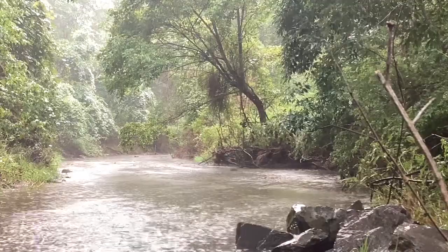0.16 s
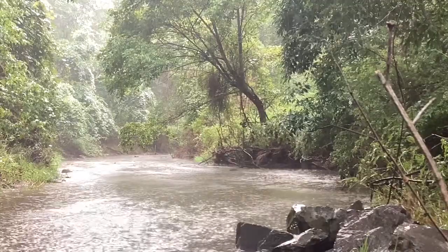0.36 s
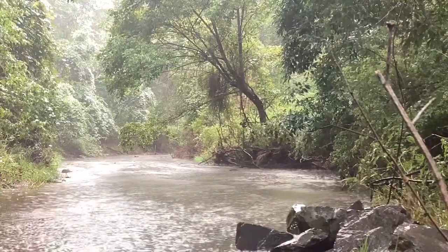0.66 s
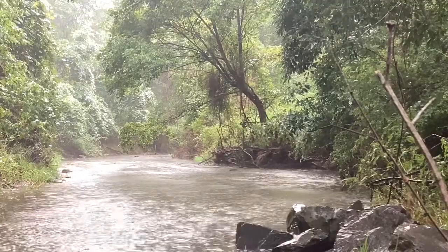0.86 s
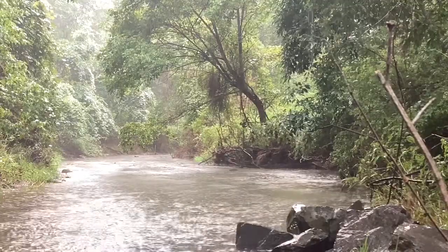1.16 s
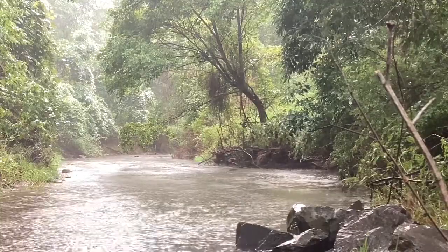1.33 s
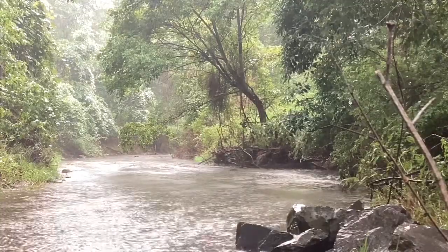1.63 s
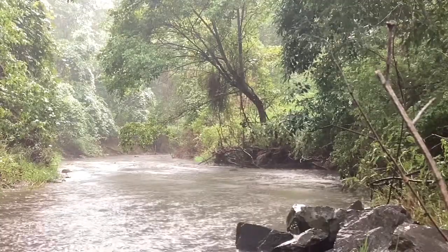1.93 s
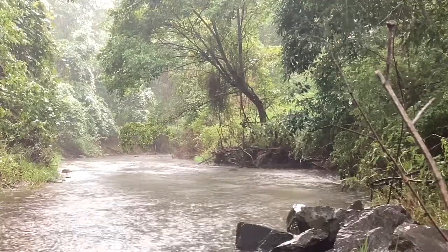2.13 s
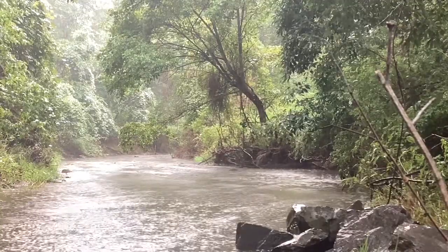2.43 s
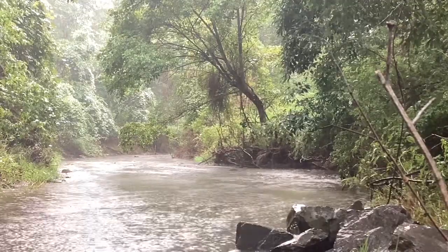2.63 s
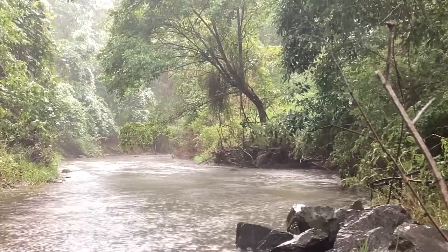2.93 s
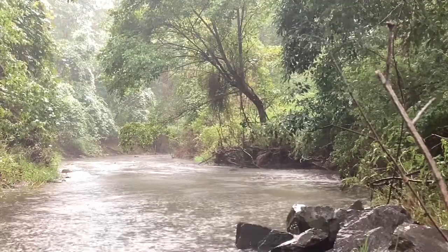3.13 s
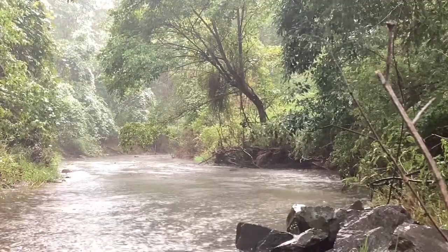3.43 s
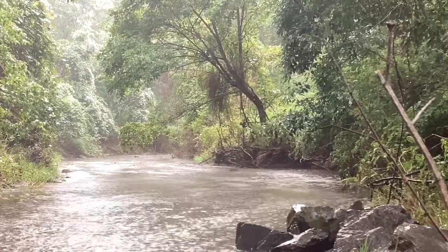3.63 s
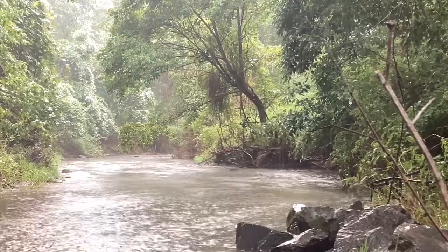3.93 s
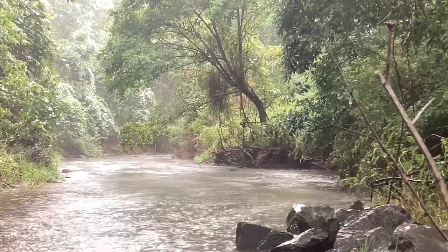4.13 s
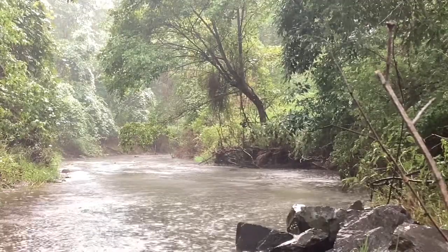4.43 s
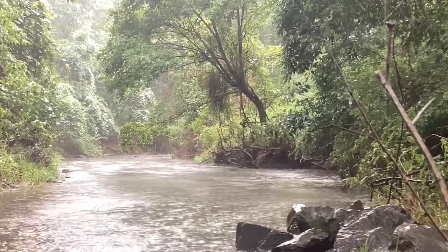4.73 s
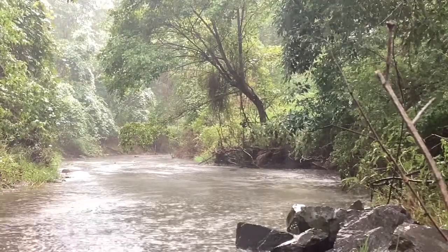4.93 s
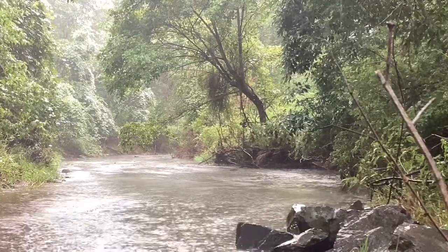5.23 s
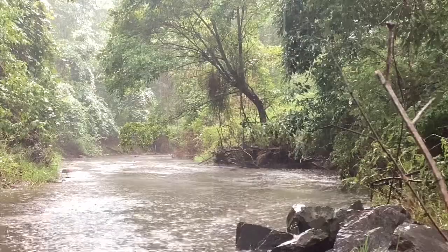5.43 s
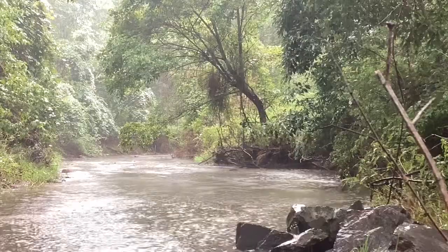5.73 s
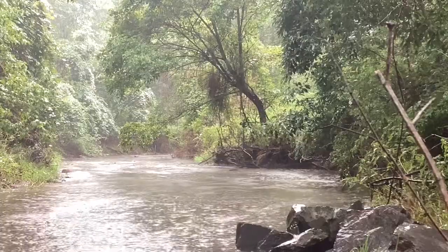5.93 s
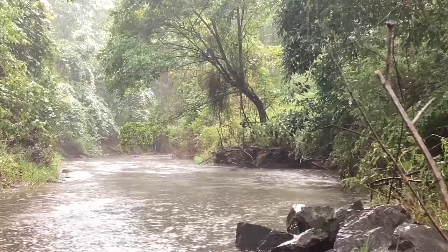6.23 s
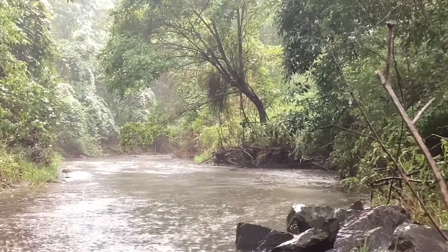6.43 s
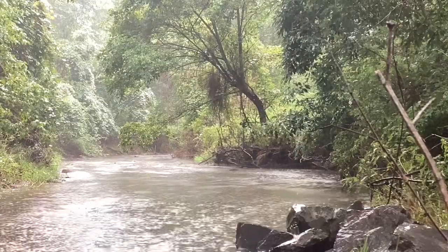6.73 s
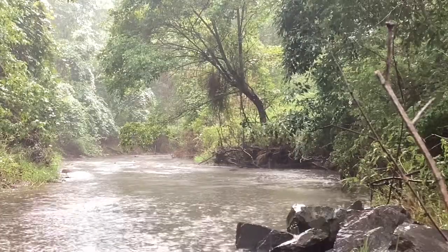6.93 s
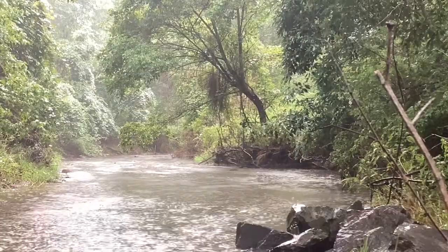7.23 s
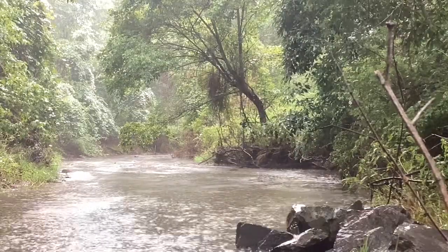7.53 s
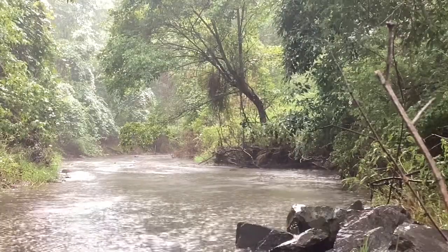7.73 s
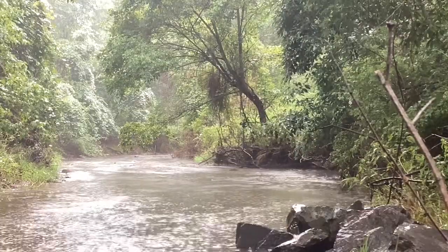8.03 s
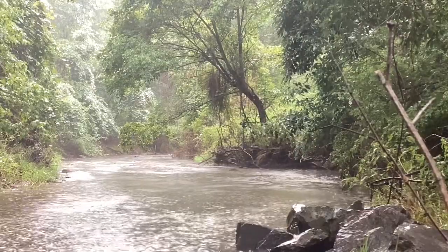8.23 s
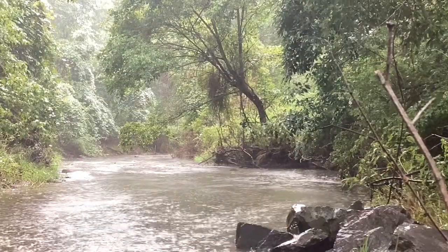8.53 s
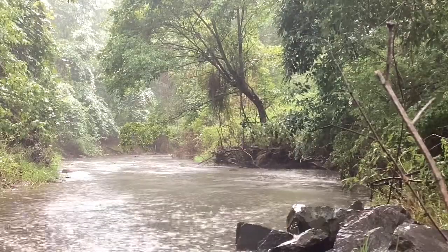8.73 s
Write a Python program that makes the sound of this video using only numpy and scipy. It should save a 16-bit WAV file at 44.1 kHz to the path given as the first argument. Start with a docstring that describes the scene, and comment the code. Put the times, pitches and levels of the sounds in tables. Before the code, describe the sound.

From the start to the end, near 9 seconds, heavy rain pours evenly on a creek and forest leaves: a dense midrange wash with grainy patter, short pings on leaves and stones, spitting splashes and fine bright ticks. Very faintly behind it, a low rumble and a far motor climb in pitch; a weak hum fades by 1.7. Fat drops strike a cover right at the microphone as quick downward-snapping smacks: light at 1.3, strong at 2.4, moderate at 3.2, weaker around 4.5 and 4.9. A light hollow knock and soft bump come at 2.2, a fainter knock at 4.1, a dull plop at 1.7. Near 3 the motor drops lower, then climbs to the end. At 5.7 the loudest smack cracks, and the rain ducks for a moment before recovering. Two softer smacks close together at 8.1 and another near 8.7, with a low sagging plop, finish.

```python
"""From the first moment heavy rain washes over a forest creek: a filtered noise bed, click patter and spray,
pings, spits and fine ticks. A far motor, built from two engine orders, pulls up over a low rumble; a faint
sine hum ends at 1.7 s. From 1.3 s fat drops smack a cover as downward sweeps, amid sagging plops, knocks
and bumps made of dying modes. Near 3 s the motor drops to a lower speed, then pulls up again to the end.
At 5.7 s the loudest smack makes the limiter duck; softer smacks and a last plop follow after 8 s."""
import sys
import numpy as np
from scipy import signal
from scipy.fft import rfft, irfft
from scipy.io import wavfile
from scipy.ndimage import uniform_filter1d, minimum_filter1d

SR = 44100
rng = np.random.default_rng(int(sys.argv[2]) if len(sys.argv) > 2 else 0)


def inscribe(sig):
    """Save sig as 16-bit PCM at rate SR to the path in sys.argv[1].

    A 1-D sig is mono; a 2-D sig holds one channel per row.
    Samples are clipped to [-1, 1] before scaling.
    """
    pcm = np.round(np.clip(np.atleast_2d(sig).T, -1, 1) * 32767)
    wavfile.write(sys.argv[1], SR, pcm.astype(np.int16))


N = 390726  # length in samples


# Tone of the rain on water and leaves: f/Hz, relative level/dB per Hz
RAIN_SPECTRUM = [(180, -12.5), (370, -12.5), (560, -10), (800, -5), (1300, -3), (1650, -8.5), (2050, -5),
                 (2650, -4.5), (3200, -11), (3700, -18.5), (5000, -23), (7500, -26.5), (11000, -33.5),
                 (15800, -41.5)]
# Resonances that colour the rain: f/Hz, width/Hz, lift/dB
RAIN_RESONANCES = [(1109, 283, 7), (2054, 130, 2.5), (4730, 520, 2), (5990, 100, 7), (7100, 400, 0.5),
                   (9230, 580, 2.5), (11300, 400, 3.5), (12760, 1200, 8)]
WASH_DB, SPRAY_DB = -33, -60.5  # rms levels


def rain(patter_db=-10.5):
    """Countless far drops merge into a wash; nearer ones patter on leaves and prickle on the water."""
    flicker_db = 0.58 * drift(27)
    wash = colour(rng.standard_normal(N), RAIN_SPECTRUM, RAIN_RESONANCES) * from_db(flicker_db)
    # each leaf answers in its own pitch range
    leaves = sum(band(impacts(per_s=70, spread_db=3.8), hz / 1.21, hz * 1.24)
                 for hz in np.geomspace(500, 5000, num=9))
    # patter level is relative to the wash
    patter = from_db(patter_db) * colour(leaves, RAIN_SPECTRUM, RAIN_RESONANCES)
    # fine drops arrive in small flurries
    flurry = from_db(4.0 * drift(10))
    fine = sum(band(impacts(per_s=240 * flurry, spread_db=5.5), hz / 2.23, hz * 1.9)
               for hz in np.geomspace(5500, 13000, num=3))
    spray = from_db(SPRAY_DB) * colour(fine, RAIN_SPECTRUM, RAIN_RESONANCES)
    return from_db(WASH_DB) * (wash + patter) + spray


def plinks(per_s=45, plink_db=-35.5, spread_db=1.0, cycles=3.5, tilt_db=-3.0):
    """Drops on nearby leaves and stones: brief pings of any pitch, the higher ones weaker."""
    out, t = np.zeros(N), np.arange(SR // 40) / SR
    for when, pitch, size in rng.random((int(per_s * N / SR), 3)):
        octaves = 2.6 * pitch
        hz = 1400 * 2 ** octaves
        db = plink_db + tilt_db * octaves + spread_db * min(-np.log(1 - size), 4)
        # the swell peaks after a fixed number of cycles
        ping = swell(t, cycles / hz) * np.sin(2 * np.pi * hz * t)
        add(out, when * N / SR, from_db(db) * ping)
    return out


def splashes(per_s=45, splash_db=-48.0, spread_db=3.0, scatter_s=0.0041):
    """Drops shatter on the nearby rocks, each into a short spit of droplets made of band-passed noise."""
    out, t = np.zeros(N), np.arange(SR // 20) / SR
    for when, pitch, size, length in rng.random((int(per_s * N / SR), 4)):
        hz = 3800 * 3.4 ** pitch
        db = splash_db - 5 * pitch + spread_db * min(-np.log(1 - size), 3.5)
        spit = swell(t, scatter_s * (0.18 + length)) * rng.standard_normal(len(t))
        add(out, when * N / SR, from_db(db) * band(spit, hz / 1.25, hz * 1.25))
    return out


# Tone of a smack: f/Hz, relative level/dB
SMACK_TONE = [(70, -7), (170, 0.5), (290, -3.5), (620, -2), (1050, 3), (2000, 3.5), (3300, -1),
              (4200, -10.5), (7000, 8)]
# What the cover rings with: f/Hz, width/Hz, lift/dB
COVER_MODES = [(218, 40, 2), (306, 18, 4), (428, 53, 6), (1060, 160, 3.5), (1950, 92, 5), (3620, 170, 9)]


def cover_response(hz):
    """The struck cover lifts and rings its own modes and loses the deepest bass."""
    points_hz, points_db = np.transpose(SMACK_TONE)
    response = from_db(np.interp(np.log(hz), np.log(points_hz), points_db))
    response = response * hz / (hz + 30)
    for mode in COVER_MODES:
        response = response * resonance(hz, *mode)
    return response


# Returns of the wave from the cover's rim: delay/s, gain (linear), top edge f/Hz
RIM_RETURNS = [(.0019, 0.29, 3200), (.0038, 0.67, 2240), (0.011, 0.25, 900), (0.02, 0.2, 500)]


def rim_response(hz):
    """The wave comes back from the rim late and duller."""
    return sum(gain * np.exp(-2j * np.pi * hz * delay_s) / (1 + (hz / edge_hz) ** 2)
               for delay_s, gain, edge_hz in RIM_RETURNS)


# Fat drops on the cover: t/s, peak level/dB before the splash and the final filters, hardness (0-1),
# relative bass lift/dB, splash level/dB before its band-pass, f/Hz that the struck spot favours
COVER_DROPS = [(1.2682, -18.5, .1, -2, -46, 1160), (1.2765, -19.5, 1, -6, -36, 1000),
               (2.4377, -3.5, .5, 0.5, -16, 330), (3.2336, -11, .1, -15, -45, 1880),
               (3.351, -21, .4, 6, -50, 480), (4.5278, -13.5, 0.9, -26, -23, 1953),
               (4.8993, -22, .5, 6, -38, 742), (5.691, 1.3, 0.8, -2.5, -15, 823),
               (8.127, -13, .15, -13.5, -40, 1343), (8.1640, -18, .5, -20, -34, 2350),
               (8.7554, -16, .5, -21, -44, 2230)]
SOFT_TOP_HZ, HARD_OCTAVES = 2200, 0.73  # top edge at hardness 0, and its rise at hardness 1
SWEEP_CYCLES, SWEEP_CYCLES_PER_DB = 3.8, 0.1  # sweep at 0 dB, and its change with level


def smacks(bass_hz=1350, spot_db=10.0, spot_q=11.0, splash_s=0.00057,
           splash_low_hz=4400, splash_high_hz=11800):
    """Short bending waves run fastest, so a click reaches the microphone as a quick downward sweep."""
    out, hz = np.zeros(N), np.maximum(np.arange(4097) * SR / 8192, 1)
    t = np.arange(SR // 50) / SR
    cover, returns = cover_response(hz), rim_response(hz)
    bass = 1 / (1 + (hz / bass_hz) ** 6)
    for s, peak_db, hardness, bass_db, splash_db, spot_hz in COVER_DROPS:
        # a harder drop is brighter and rebounds more; a louder one sweeps longer
        top_hz = SOFT_TOP_HZ * 2 ** (HARD_OCTAVES * hardness)
        softness = 1 / np.sqrt(1 + (hz / top_hz) ** 8)
        cycles = SWEEP_CYCLES + SWEEP_CYCLES_PER_DB * peak_db
        lag = 2 * np.pi * cycles * np.log1p(hz / 30)  # phase lag in radians
        direct = np.exp(-1j * lag)
        # returns are more spread out than the direct wave
        rebound = hardness * returns * np.exp(-1.3j * lag)
        spot = resonance(hz, spot_hz, spot_hz / spot_q, spot_db) * from_db(bass_db * bass)
        smack = irfft(cover * (direct + rebound) * softness * spot)
        add(out, s, from_db(peak_db) * smack / np.abs(smack).max())
        # the drop itself shatters in a brief hiss
        hiss = swell(t, splash_s) * rng.choice([-1, 1], len(t))
        add(out, s, from_db(splash_db) * band(hiss, splash_low_hz, splash_high_hz))
    return out


# The clearest tiny drops close by: t/s, level/dB before trim and band-pass, f/Hz
CLEAR_TICKS = [(1.0306, -30, 10000), (2.180, -29, 5800), (2.2891, -35, 12000), (3.908, -34, 10500),
               (4.1013, -34.5, 12000), (4.158, -34, 10000), (4.223, -34, 9000), (4.2372, -29, 4800),
               (6.196, -31, 6500), (6.821, -27.5, 8800)]
# fainter ones fall at random: rate, level before trim and band-pass, lowest pitch, pitch range
FAINT_TICKS_PER_S, FAINT_TICK_DB, FAINT_TICK_HZ, FAINT_TICK_OCTAVES = 2.4, -37.5, 7000, .85


def ticks(trim_db=2.5, burst_s=0.00048, width=1.29):
    """A tiny drop bursts in a few milliseconds of bright hiss."""
    out, t = np.zeros(N), np.arange(SR // 50) / SR
    faint = [(when * N / SR, FAINT_TICK_DB, FAINT_TICK_HZ * 2 ** (FAINT_TICK_OCTAVES * pitch))
             for when, pitch in rng.random((int(FAINT_TICKS_PER_S * N / SR), 2))]
    for s, db, hz in CLEAR_TICKS + faint:
        burst = swell(t, burst_s) * rng.standard_normal(len(t))
        add(out, s, from_db(db + trim_db) * band(burst, hz / width, hz * width))
    return out


# Dull plops: t/s, starting f/Hz, envelope level/dB, time until the pitch has halved/s
DULL_PLOPS = [(1.668, 950, -31.5, .007), (4.531, 250, -31, .09), (8.721, 520, -25.5, .35)]


def plops(swell_s=0.0066):
    """Soft blows: one sagging pitch each, quickly swelling and dying."""
    out, t = np.zeros(N), np.arange(SR // 3) / SR
    for s, hz, db, halving_s in DULL_PLOPS:
        tone = np.sin(falling(t, hz, halving_s))
        add(out, s, from_db(db) * swell(t, swell_s) * tone)
    return out


# Light hollow knocks close by: t/s, level/dB applied to the summed modes
HOLLOW_KNOCKS = [(2.181, -20), (4.068, -28)]
# What they ring with: f/Hz, relative level/dB, swell/s
HOLLOW_MODES = [(1780, 0, 0.003), (790, -7.5, 0.007), (480, -8, 0.0038)]


def knocks():
    """Each light knock excites the same three hollow modes."""
    return blows(HOLLOW_KNOCKS, HOLLOW_MODES)


# Soft low bumps: t/s, level/dB applied to the summed modes
LOW_BUMPS = [(1.69, -40), (2.199, -31.5), (3.67, -44), (5.84, -41)]
# What they ring with: f/Hz, relative level/dB, swell/s
LOW_MODES = [(69.3, 0.5, 0.025), (126, -1, .013)]


def bumps():
    """Each soft bump excites the same two low modes."""
    return blows(LOW_BUMPS, LOW_MODES)


# Far motor pulling up through two gears: t/s, speed f/Hz (turns per second) before a slight wander
MOTOR_SPEED = [(0, 15.1), (1.5, 19), (2.7, 24.7), (3.2, 13.6), (4.3, 16), (6, 19.6), (7, 21.4),
               (8.86, 24.4)]
# Audible multiples of the motor's speed: order number
ENGINE_ORDERS = (4, 5)
# One entry for each order: level/dB at the boom
ENGINE_ORDER_DB = (-50, -43.5)
BOOM_HZ, BOOM_WIDTH_HZ = 88.4, 12.8  # exhaust resonance


def motor(t):
    """Only the lowest engine orders carry this far, each swelling as it passes the exhaust boom."""
    turns = np.interp(t, *np.transpose(MOTOR_SPEED)) * (1 + 0.0032 * drift(2.3))
    angle = 2 * np.pi * np.cumsum(turns) / SR
    out = np.zeros(N)
    for order, db in zip(ENGINE_ORDERS, ENGINE_ORDER_DB):
        boom = 1 / np.hypot(1, 2 * (order * turns - BOOM_HZ) / BOOM_WIDTH_HZ)
        out += from_db(db) * boom * np.sin(order * angle)
    return out


def hum(t, hz=143, level_db=-50, end_s=1.7, fade_s=0.28):
    """A faint steady sine that fades out at its end."""
    fade = np.clip((end_s - t) / fade_s, 0, 1)
    return from_db(level_db) * fade * np.sin(2 * np.pi * hz * t)


# Tone of the distant rumble: f/Hz, relative level/dB per Hz
RUMBLE_SPECTRUM = [(25, -20), (38, -22), (52, -15), (68, -4.5), (90, -1), (130, -1.5), (175, -14),
                   (260, -27)]


def rumble(level_db=-49.0):
    """Distant low rumble: noise shaped to a bass band."""
    return from_db(level_db) * colour(rng.standard_normal(N), RUMBLE_SPECTRUM)


def distance():
    """Motor and hum waver together in level over the steady rumble."""
    t = np.arange(N) / SR
    tones = motor(t) + hum(t)
    return tones * from_db(drift(4.6)) + rumble()


def blows(events, modes):
    """Every blow on a body sets the same few modes swelling and dying."""
    out, t = np.zeros(N), np.arange(SR // 3) / SR
    ring = sum(from_db(db) * swell(t, swell_s) * np.sin(2 * np.pi * hz * t) for hz, db, swell_s in modes)
    for s, db in events:
        add(out, s, from_db(db) * ring)
    return out


def resonance(hz, centre_hz, width_hz, lift_db):
    """Response that lifts one band and lets it ring."""
    return 1 + (from_db(lift_db) - 1) / (1 + 2j * (hz - centre_hz) / width_hz)


def falling(t, hz, halving_s):
    """Phase of a tone that starts at hz and sags, halved after halving_s."""
    return 2 * np.pi * hz * halving_s * np.log1p(t / halving_s)


def swell(t, peak_s):
    """Envelope that rises to 1 at peak_s and dies away."""
    return t / peak_s * np.exp(1 - t / peak_s)


def impacts(per_s, spread_db):
    """Clicks at random moments: many small ones, few large."""
    sizes = from_db(spread_db * np.minimum(rng.exponential(1, N), 4)) * rng.choice([-1, 1], N)
    return sizes * (rng.random(N) < per_s / SR)


def drift(rate):
    """Slow random wander of rms 1, changing about rate times a second."""
    hz = np.arange(N // 2 + 1) * SR / N
    return rms_one(irfft(rfft(rng.standard_normal(N)) / (1 + (hz / rate) ** 2), N))


def colour(x, spectrum, peaks=()):
    """Filter x by a smooth spectrum with resonances on top; rms 1."""
    hz = np.maximum(np.arange(N // 2 + 1) * SR / N, 1)
    points_hz, points_db = np.transpose(spectrum)
    db = np.interp(np.log(hz), np.log(points_hz), points_db)
    # beyond either end the level falls by 24 dB per octave
    octaves_below = np.maximum(np.log2(points_hz[0] / hz), 0)
    octaves_above = np.maximum(np.log2(hz / points_hz[-1]), 0)
    db -= 24 * (octaves_below + octaves_above)
    for centre_hz, width_hz, lift_db in peaks:
        db += lift_db / (1 + (2 * (hz - centre_hz) / width_hz) ** 2)
    return rms_one(irfft(rfft(x) * from_db(db), N))


def band(x, low_hz, high_hz):
    """Gentle causal band-pass."""
    sos = signal.butter(2, [low_hz, min(high_hz, SR * .45)], "band", fs=SR, output="sos")
    return signal.sosfilt(sos, x + 1e-18)


def add(out, s, sound):
    """Mix a short sound in at time s."""
    at = int(np.clip(round(s * SR), 0, N - 1))
    out[at:at + len(sound)] += sound[:N - at]


def from_db(db):
    """Decibels to gain."""
    return 10 ** (np.asarray(db) / 20)


def rms_one(x):
    """Scale to rms 1."""
    return x / np.sqrt(np.mean(x ** 2) + 1e-20)


def limiter(x, ceiling_db=-2.0, hold_s=0.09, release_db_per_s=60.0):
    """Peaks over the ceiling pull the gain down at once; it holds, then recovers."""
    over_db = np.maximum(20 * np.log10(np.abs(x) + 1e-9) - ceiling_db, 0)
    half = int(hold_s * SR / 2)
    # the largest overshoot within the hold time
    held_db = -minimum_filter1d(-over_db, size=2 * half + 1, origin=half)
    # a running maximum against a ramp gives a straight-line release
    ramp_db = release_db_per_s * np.arange(N) / SR
    cut_db = np.maximum.accumulate(held_db + ramp_db) - ramp_db
    return x * from_db(-uniform_filter1d(cut_db, size=16))


def scene(top_hz=13800):
    """Everything at one microphone; the bursts of close drops thin out at the very top."""
    soften = signal.butter(3, top_hz, fs=SR, output="sos")
    close = signal.sosfilt(soften, smacks() + ticks())
    dull = plops() + knocks() + bumps()
    return (rain() + plinks() + splashes() + distance() + close + dull)[None]


def record(dry, bass_cut_hz=48, top_cut_hz=15900):
    """The microphone sheds deep bass, the limiter acts, the top is cut."""
    bass_cut = signal.butter(4, bass_cut_hz, "high", fs=SR, output="sos")
    top_cut = signal.ellip(12, .1, 80, top_cut_hz, fs=SR, output="sos")
    limited = limiter(signal.sosfilt(bass_cut, dry[0]))
    return signal.sosfilt(top_cut, limited)[None]


dry = scene()
out = record(dry)
inscribe(out)
```